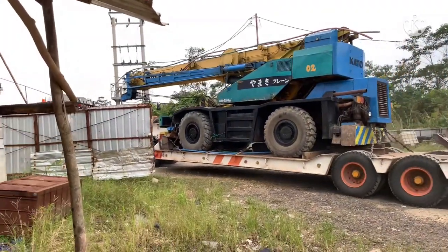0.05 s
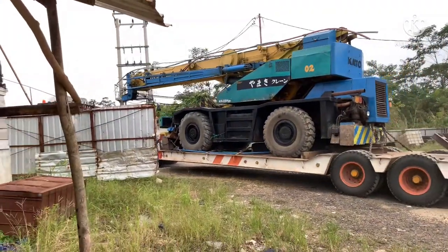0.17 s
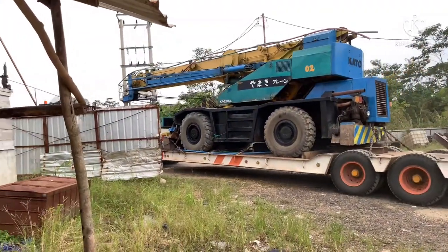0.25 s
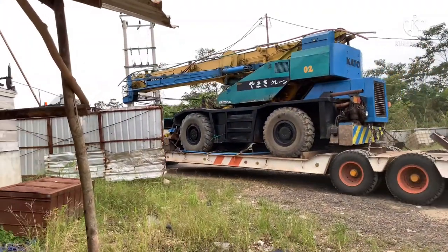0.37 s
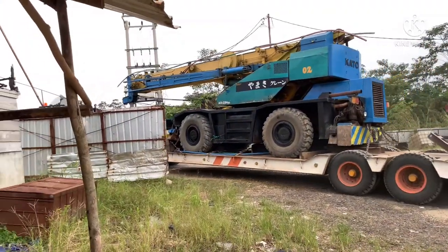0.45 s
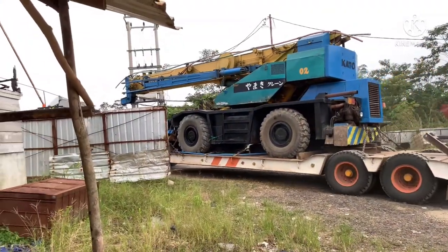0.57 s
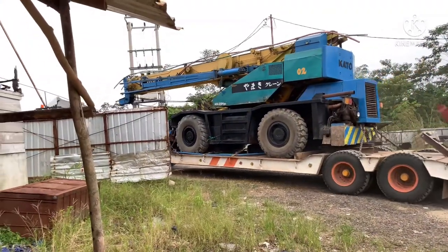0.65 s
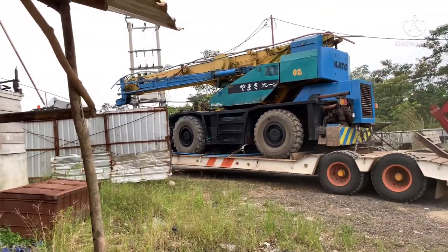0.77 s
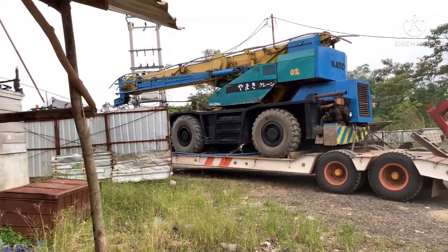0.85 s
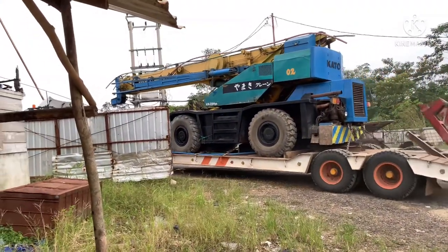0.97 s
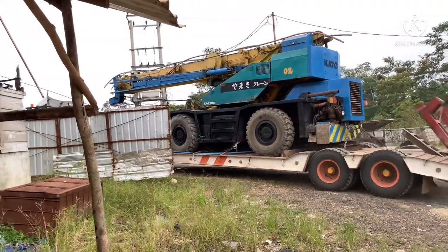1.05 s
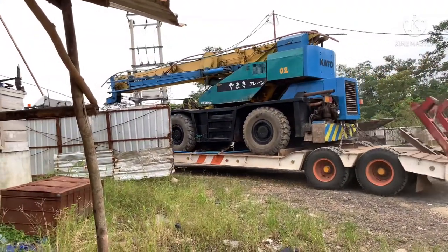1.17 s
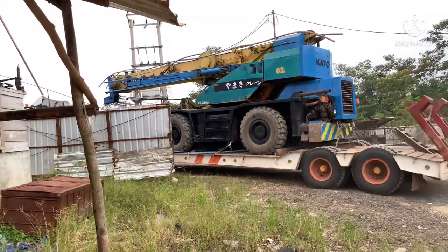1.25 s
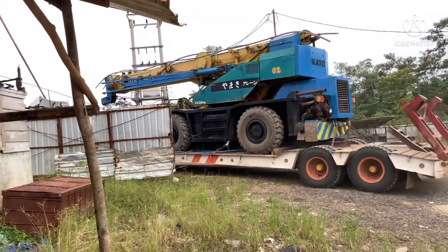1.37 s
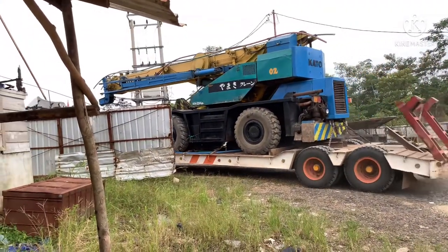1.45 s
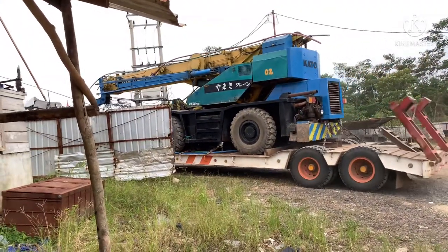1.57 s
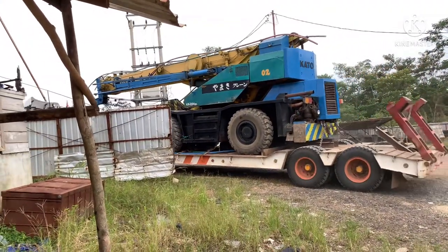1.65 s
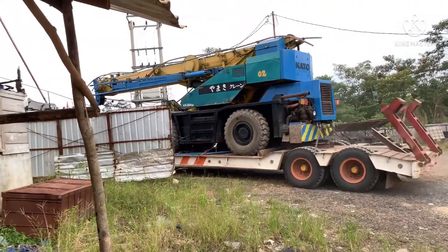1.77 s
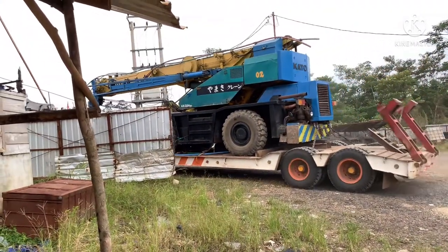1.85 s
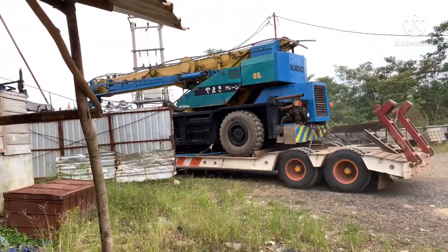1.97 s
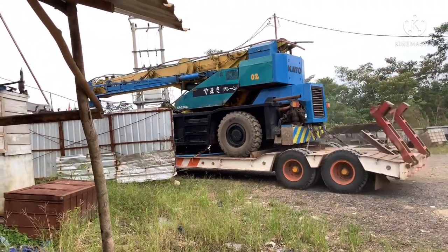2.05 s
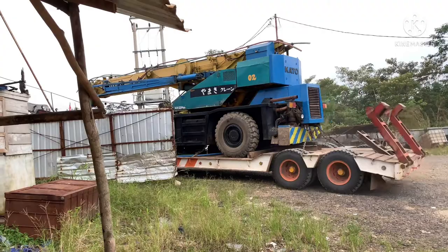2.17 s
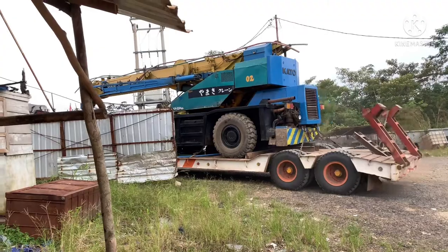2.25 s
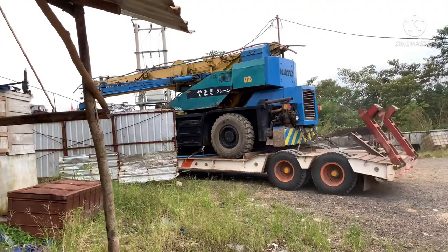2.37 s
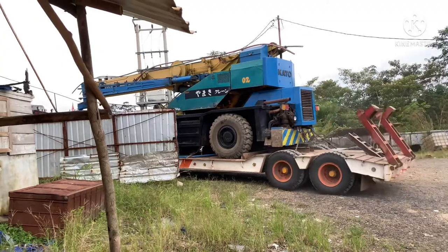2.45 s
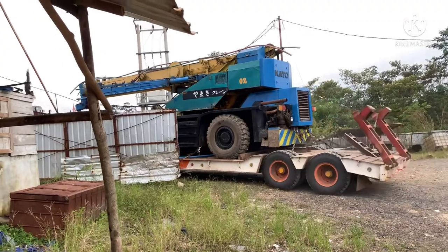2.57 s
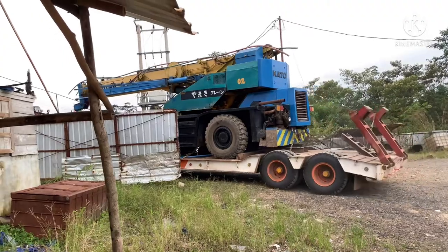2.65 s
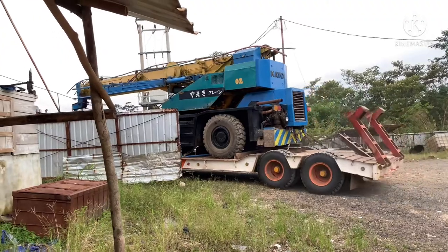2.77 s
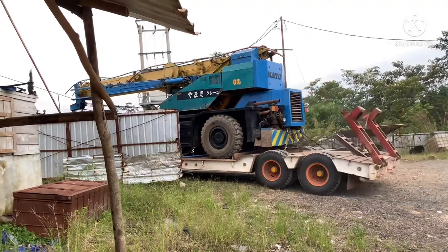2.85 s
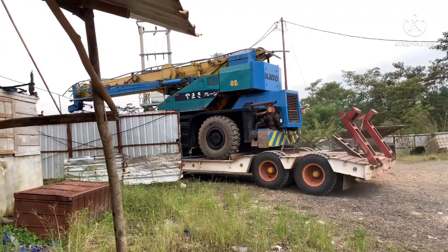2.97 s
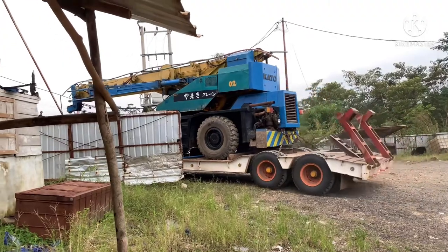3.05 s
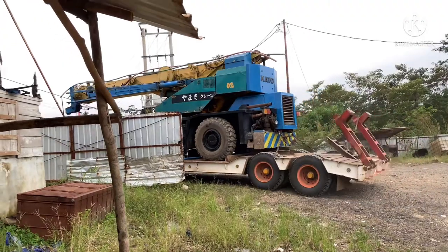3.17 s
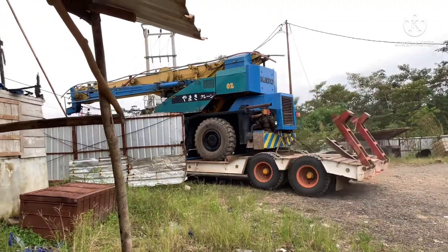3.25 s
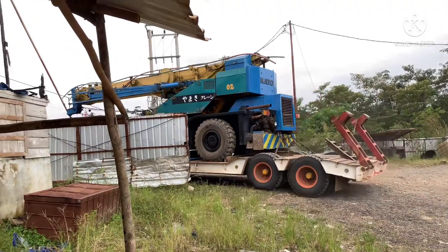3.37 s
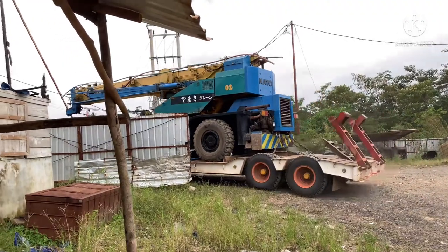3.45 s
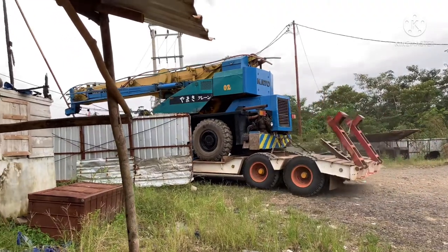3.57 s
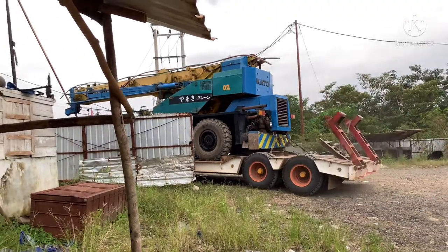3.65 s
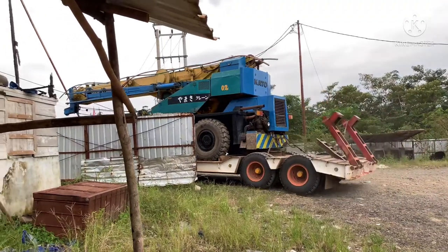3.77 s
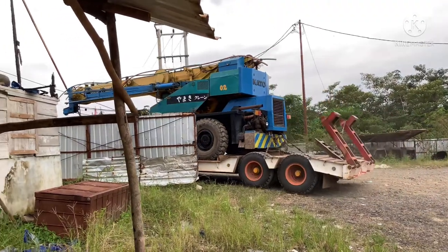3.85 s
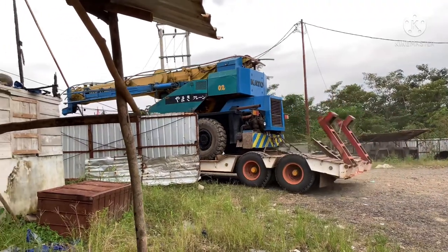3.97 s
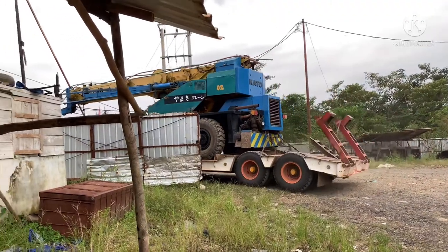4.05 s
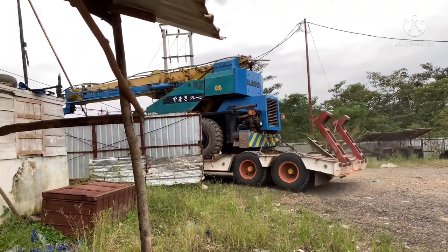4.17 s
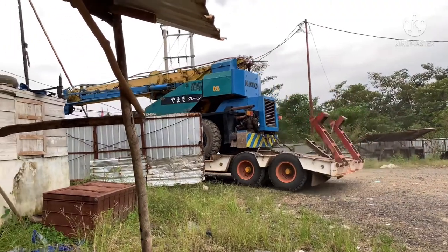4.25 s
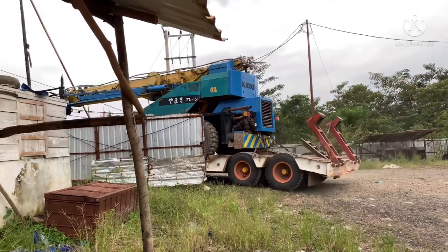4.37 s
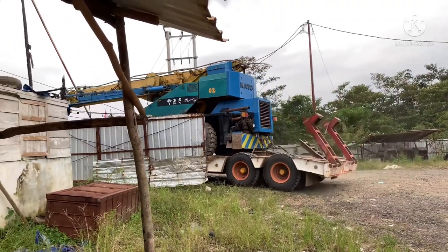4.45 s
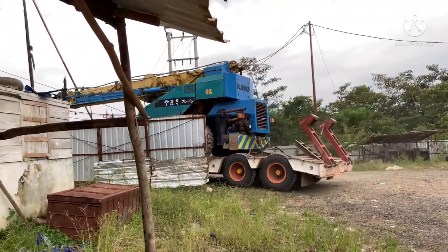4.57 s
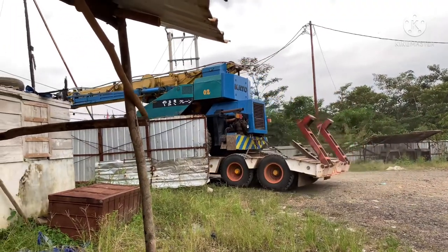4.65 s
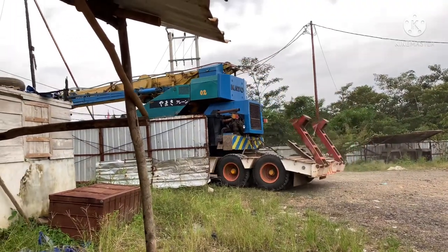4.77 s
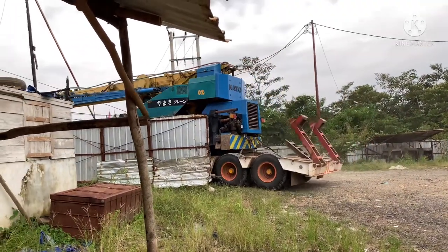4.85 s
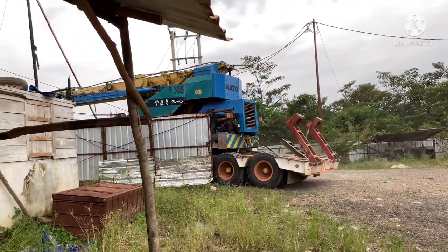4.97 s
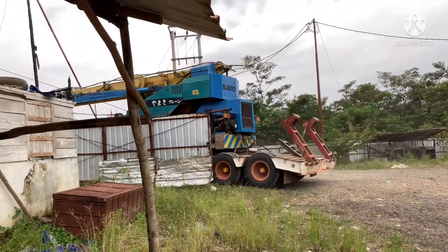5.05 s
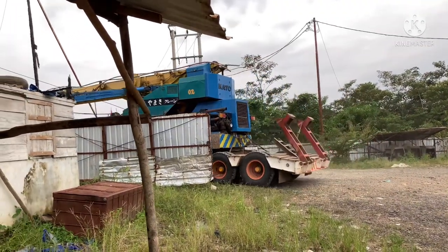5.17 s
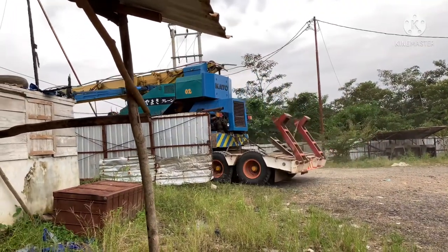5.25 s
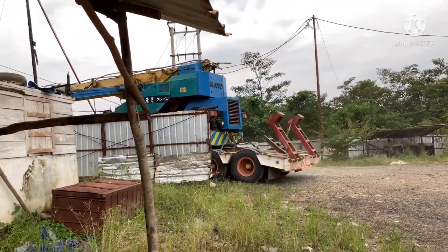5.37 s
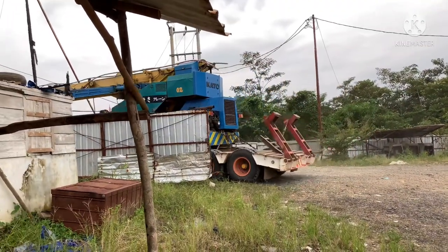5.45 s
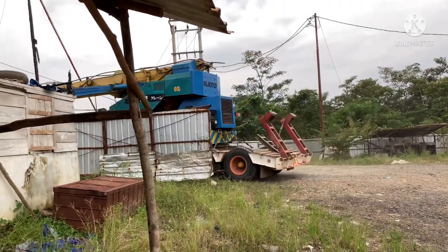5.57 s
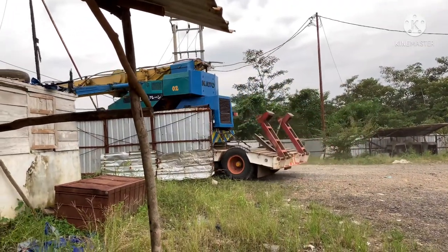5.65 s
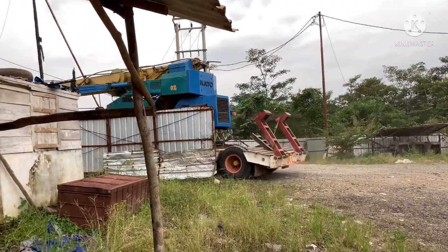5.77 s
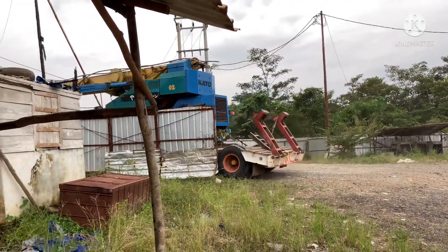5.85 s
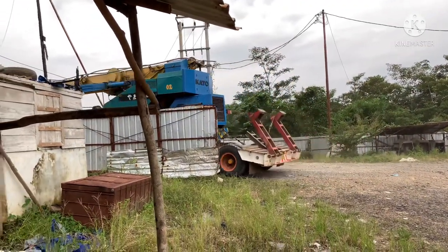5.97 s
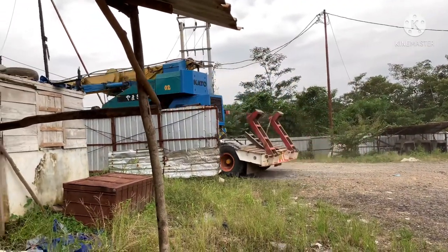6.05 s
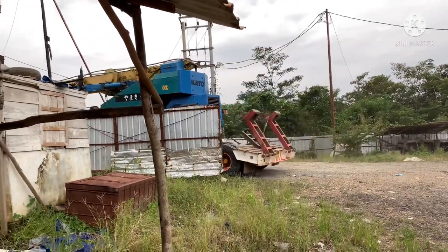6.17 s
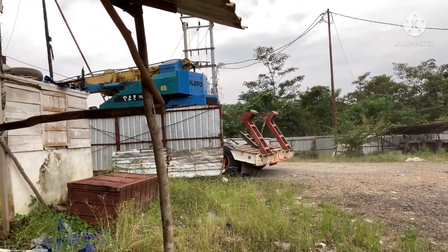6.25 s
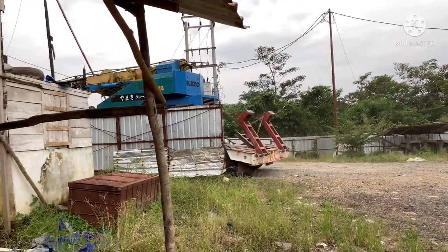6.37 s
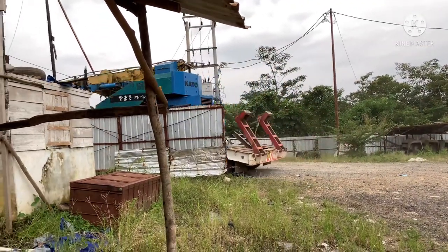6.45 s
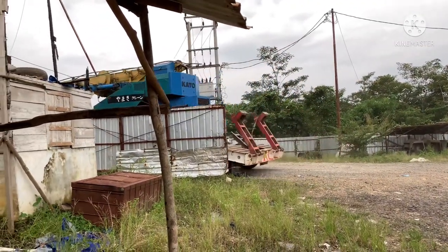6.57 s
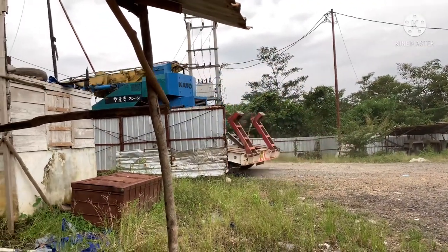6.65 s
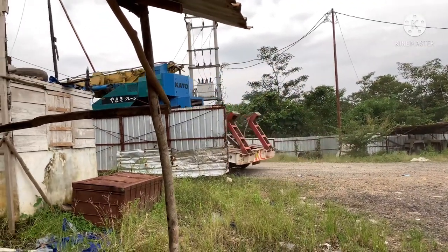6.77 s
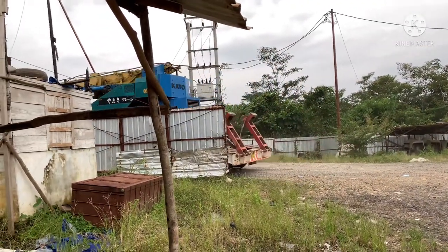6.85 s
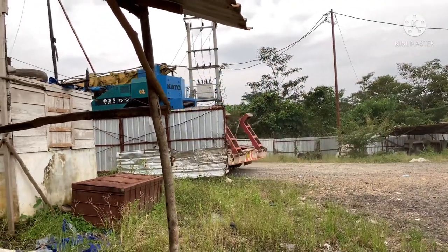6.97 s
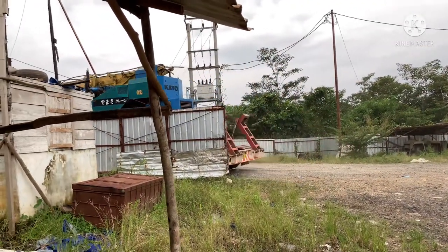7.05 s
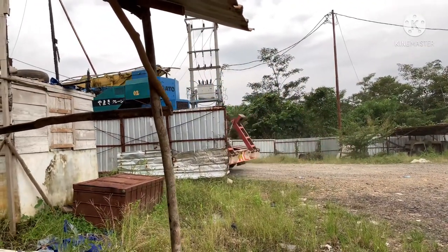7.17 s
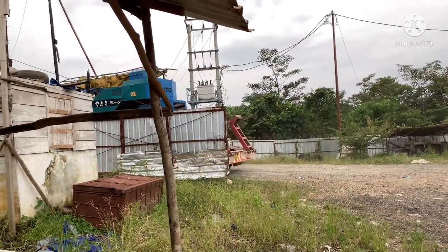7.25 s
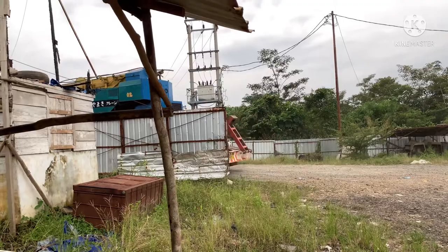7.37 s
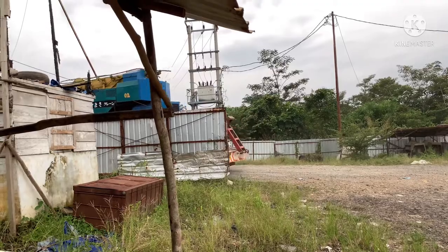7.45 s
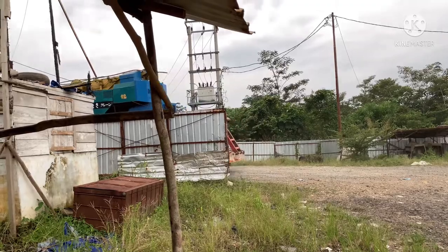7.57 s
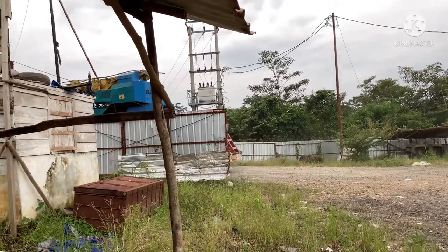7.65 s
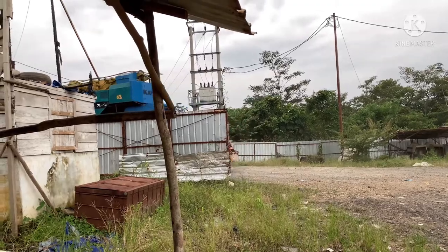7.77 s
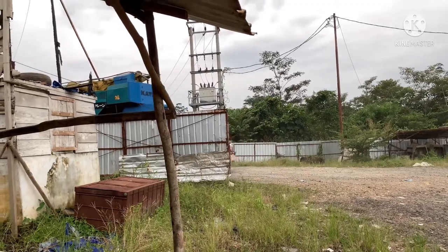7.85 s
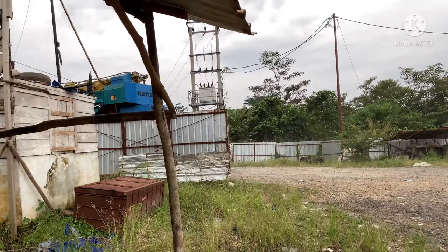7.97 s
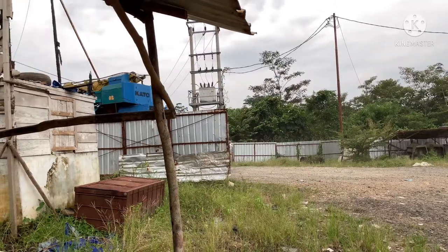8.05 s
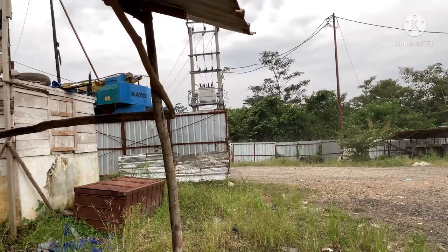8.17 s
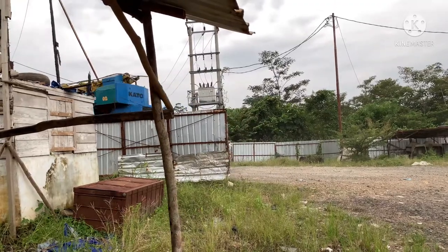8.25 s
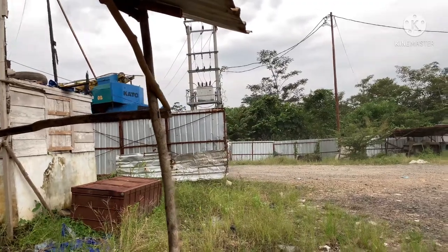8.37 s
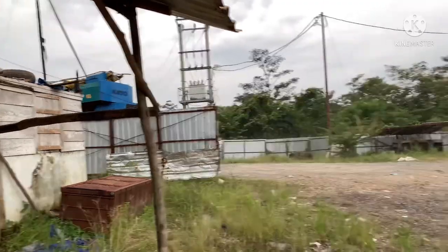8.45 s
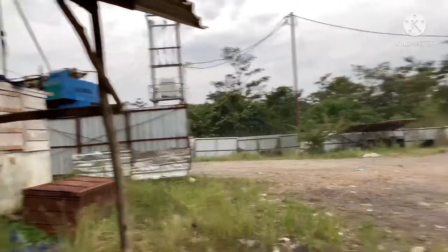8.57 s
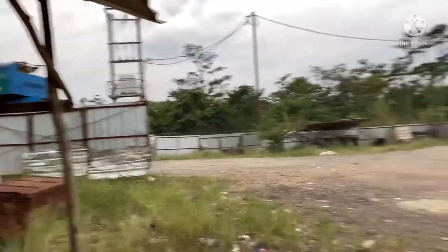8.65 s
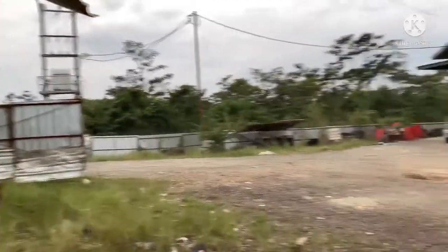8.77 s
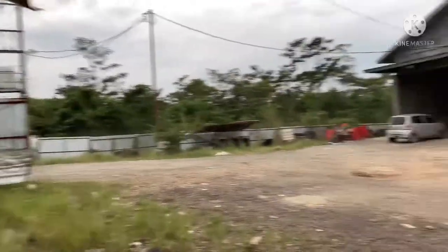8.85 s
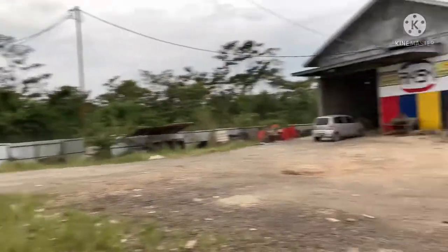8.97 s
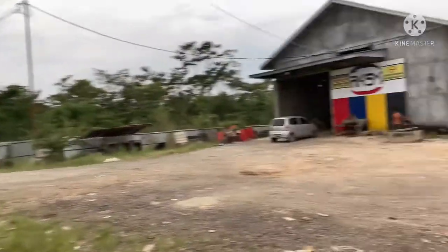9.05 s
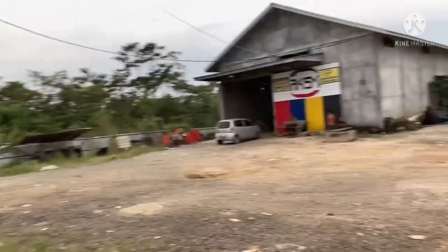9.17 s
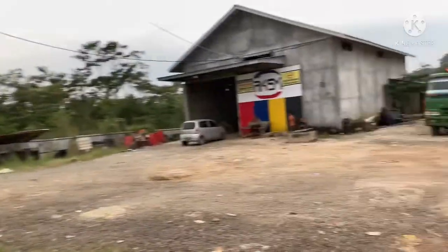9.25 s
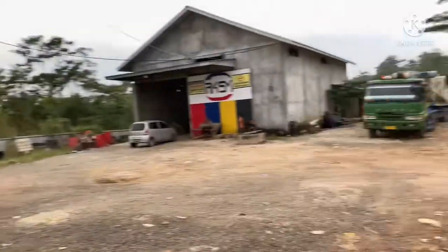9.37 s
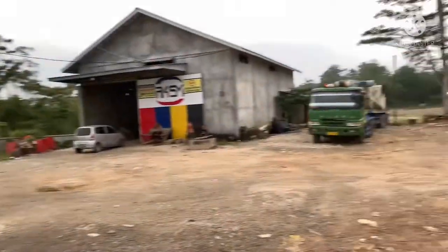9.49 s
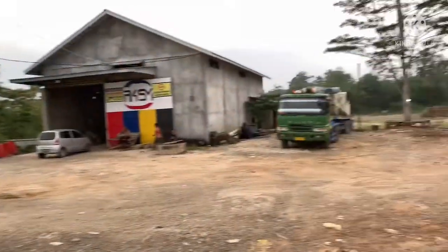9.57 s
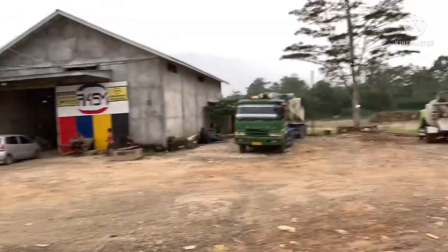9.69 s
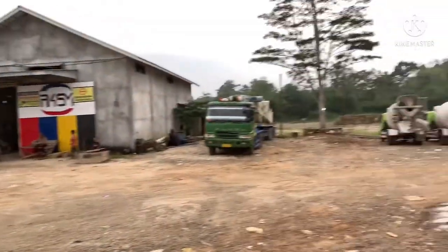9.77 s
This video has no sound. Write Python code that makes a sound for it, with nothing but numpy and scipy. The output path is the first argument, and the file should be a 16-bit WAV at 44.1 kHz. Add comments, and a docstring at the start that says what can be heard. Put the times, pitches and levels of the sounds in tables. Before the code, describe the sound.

Open dirt yard, stereo microphone roughly ten metres from a slow heavy diesel truck hauling a crane on a low trailer. From 0 s the engine drones low with a clattering top and thin whine, over drumming deck, loose steel rattle and dense grit crackle. A chain clinks at 0.2, steel clanks at 0.5, a jolt thuds at 1.3, and the hardest double bang lands at 1.9-2.0. The engine sags to its lowest near 2.4, stones crunch, then from 2.8 it pulls and climbs, easing off around 4.7 at a higher pitch. Sharp ticks snap at 2.8, 3.4 and 5.4; plates slap between 3.7 and 7, with a clattering burst near 6. Everything gradually dulls behind a fence. At 7.3 dragged steel raps and groans, followed by a brief squeak. From 8.3 the microphone swings away; the truck fades, small squeaks sound, and distant trucks whirr and whine until 9.8.

```python
"""A six-cylinder diesel tractor hauls a low trailer with a crane slowly past a dirt yard and behind a fence.
The engine lugs, picks up and recedes; the deck rumbles and rattles, tyres crunch grit, the load knocks
and groans, and at the end the microphone turns toward other trucks across the yard.
Engine tones, a thin whine and squeaks are wavering sines, with filtered pulses for the exhaust puffs; blows
are decaying modes; rumble, clatter, grit and the yard are coloured noise, often broken into random grains."""
import sys
import numpy as np
from scipy import signal
from scipy.fft import rfft, irfft, next_fast_len
from scipy.io import wavfile
from scipy.ndimage import uniform_filter1d, map_coordinates

SR = 44100
rng = np.random.default_rng(int(sys.argv[2]) if len(sys.argv) > 2 else 0)


def output_pcm(signal):
    """Save a mono or channel-first signal as 16-bit PCM at the path in sys.argv[1].

    Samples are clipped to [-1, 1] before scaling.
    """
    pcm = np.clip(np.atleast_2d(signal).T, -1, 1) * 32767
    wavfile.write(sys.argv[1], SR, np.round(pcm).astype(np.int16))


N = 433062


def amp(db):
    """Decibels: a level becomes an amplitude ratio."""
    return 10 ** (np.asarray(db) / 20)


def unit(x):
    """Normalisation: the signal is scaled to rms 1."""
    return x / np.sqrt(np.mean(x ** 2) + 1e-20)


def seconds():
    """Sampling: the time of each sample."""
    return np.arange(N) / SR


def along(points, hz):
    """Logarithmic frequency: (Hz, value) points are joined on a log axis."""
    point_hz, values = np.transpose(points)
    return np.interp(np.log(hz + 1), np.log(point_hz + 1), values)


def curves(rows):
    """Slow modulation: one value per sample for each column after the time."""
    times, *columns = np.transpose(rows)
    return [np.interp(seconds(), times, column) for column in columns]


def swells(rows):
    """Gaussian modulation: a level in dB made of smooth humps and hollows."""
    return sum(db * np.exp(-((seconds() - s) / width) ** 2) for s, db, width in rows)


def wobble(rate):
    """Random modulation: a smooth curve through normal draws, rate knots a second."""
    positions = np.arange(0, N + 32, 32) * rate / SR
    knots = map_coordinates(rng.standard_normal(4000), [positions], mode="wrap")
    # straight lines between points 32 samples apart
    return (knots[:-1, None] + np.diff(knots)[:, None] * np.arange(32) / 32).ravel()[:N]


def filtered(x, response):
    """Linear filtering: the spectrum is multiplied by a response of frequency."""
    m = next_fast_len(N + SR // 4, True)
    return irfft(rfft(x, m) * response(np.fft.rfftfreq(m, 1 / SR)), m)[..., :N]


def colour(points):
    """Spectral shaping: the response that follows (Hz, dB) points."""
    return lambda hz: amp(along(points, hz))


def ringing(modes):
    """Modal resonance: the summed response of damped resonators (Hz, width Hz, dB)."""
    return lambda f: sum(amp(db) * 1j * f * w / (c * c - f * f + 1j * f * w) for c, w, db in modes)


# Likeness of left and right before the treble lead. Each row: frequency in Hz, correlation from -1 to 1.
PORT_CORRELATION = [(60, .99), (130, .96), (290, .97), (600, .72), (880, .68), (1300, .22), (2300, .75),
                    (3100, .35), (4600, .3), (6500, .6), (9000, .5), (15000, .5)]
LEAD_S, LEAD_ABOVE_HZ = .000453, 1050


def rush(response, drive=1):
    """Partial coherence: driven noise at two ports, mid rms 1; in the treble the left port leads."""
    m = next_fast_len(N + SR // 20, True)
    hz = np.fft.rfftfreq(m, 1 / SR)
    noise = (rng.standard_normal((2, N), np.float32) * drive).astype(np.float32)
    common, opposed = rfft(noise, m) * response(hz)
    alike = np.clip(along(PORT_CORRELATION, hz), -1, 1)
    common, opposed = common * np.sqrt(1 + alike), opposed * np.sqrt(1 - alike)
    lead = np.where(hz > LEAD_ABOVE_HZ, np.exp(2j * np.pi * hz * LEAD_S), 1)
    pair = irfft(np.array([(common + opposed) * lead, common - opposed], np.complex64), m)[:, :N]
    return pair / np.sqrt(np.mean(pair.mean(0) ** 2))


RISE_SHARE = 0.1  # a burst's rise time over its t60


def bursts(rows):
    """Exponential decay: events swell to a peak and die away; long ones swell more slowly."""
    t, power = seconds(), np.zeros(N)
    for s, db, t60 in rows:
        near = slice(max(0, int((s - .2) * SR)), int((s + .5) * SR))
        u = t[near] - s
        fall = amp(db - 60 * np.maximum(u, 0) / t60) ** 2
        power[near] += fall * np.exp(2 * np.minimum(u, 0) / (RISE_SHARE * t60))
    return np.sqrt(power)


def grains(rate, spread_db, life):
    """Random impacts: an envelope, rms 1, of brief contacts of random strength; life in seconds."""
    at = np.flatnonzero(rng.random(N) < rate / SR)
    hits = np.zeros(N)
    hits[at] = amp(spread_db * np.minimum(rng.exponential(size=N)[at], 4)) ** 2
    power = signal.lfilter([1], [1, -np.exp(-2 / (life * SR))], hits)
    return unit(np.sqrt(np.abs(power)))


def strikes(rows, modes):
    """Impulsive excitation: sharp blows set a body ringing at its modes, each blow scattering their levels."""
    out, t = np.zeros(N), np.arange(SR // 3) / SR
    for s, db in rows:
        ring = 0
        for hz, mode_db, t60 in modes:
            fading = amp(mode_db + rng.normal(0, 1) - 60 * t / t60)
            ring = ring + fading * np.sin(2 * np.pi * hz * t)
        out[round(s * SR):][:len(t)] += amp(db) * ring
    return out


def patchy(x, depth_db):
    """Time-frequency modulation: narrow streaks of the roar swell and fade at random."""
    z = signal.stft(x, nperseg=2048)[2]
    field = uniform_filter1d(rng.standard_normal(z.shape[1:]), size=3, axis=0)
    field = uniform_filter1d(field, size=7, axis=1)
    mean_gain = np.sqrt(np.mean(amp(depth_db * field / field.std()) ** 2))
    return signal.istft(z * amp(depth_db * unit(field)) / mean_gain, nperseg=2048)[1][:, :N]


SPEED_M_PER_S, DISTANCE_M = 1.668, 10.37  # speed and nearest distance
ENGINE_AHEAD_M = 2.65  # the engine is ahead of the trailer's wheels
FENCE_M, FENCE_LENGTH_M = 6.77, 8.26  # along the road: start of the fence's shadow, way to full shadow
TURN_S, TURN_LENGTH_S = 8.29, 1  # the microphone swings away toward the yard


def hidden(ahead_m=0):
    """Barrier shadow: how deep a part of the truck is behind the fence, 0-1."""
    return np.clip((SPEED_M_PER_S * seconds() + ahead_m - FENCE_M) / FENCE_LENGTH_M, 0, 1)


def turned():
    """Microphone directivity: how far it has swung toward the yard, 0-1."""
    return np.clip((seconds() - TURN_S) / TURN_LENGTH_S, 0, 1)


def passing(shade_db, turn_db=0, ahead_m=0):
    """Spherical spreading: the level change in dB from distance, fence and turn of the microphone."""
    distance = np.hypot(DISTANCE_M, SPEED_M_PER_S * seconds() + ahead_m)
    return 20 * np.log10(DISTANCE_M / distance) - shade_db * hidden(ahead_m) - turn_db * turned()


# Spectrum of the distant trucks. Each row: frequency in Hz, relative level in dB per Hz.
YARD_SPECTRUM = [(60, -1), (100, 21.5), (150, 8.5), (200, 4), (300, 0.5), (430, 5), (560, 2), (900, -3.5),
                 (1250, 2.5), (1600, -7.5), (2050, -10), (2400, -17), (3100, -9.5), (4300, -25),
                 (7000, -46), (11000, -26.5), (14000, -65)]


def yard():
    """Diffuse broadband noise: the whirr of other trucks comes in as the microphone turns to them."""
    return amp(-38.5 + 1.4 * wobble(7.7)) * np.sqrt(turned()) * rush(colour(YARD_SPECTRUM))


# Tones of a truck across the yard. Each row: frequency in Hz, relative level in dB.
FAR_WHINE_TONES = [(1190, -5), (1315, -0.5), (1390, -3)]
# Their common level before the turn. Each row: time in seconds, level in dB.
FAR_WHINE_COURSE = [(8.9, -66), (9.2, -48), (9.58, -50.5), (9.72, -47), (9.82, -43)]


def far_whine(waver_hz=18, flutter_db=2.5):
    """Frequency modulation: a truck across the yard whines in a cluster of wavering tones that firms up."""
    level_db, = curves(FAR_WHINE_COURSE)

    def tone(hz):
        cycles = np.cumsum(hz + waver_hz * wobble(60)) / SR + rng.random()
        return np.sin(2 * np.pi * cycles)

    def cluster():
        return sum(amp(level_db + db + flutter_db * wobble(23)) * tone(hz) for hz, db in FAR_WHINE_TONES)

    return turned() * np.array([cluster() for port in range(2)])


# Squeaks of dry joints. Each row: centre in seconds, mean pitch in Hz, level in dB, half width in seconds.
JOINT_SQUEAKS = [(7.51, 1730, -52, 0.036), (8.68, 2740, -47, 0.013), (8.77, 2670, -51, .02),
                 (8.9, 2450, -48, .06), (9.37, 1580, -46.5, 0.032)]
SQUEAK_WAVER_HZ, SQUEAK_WAVERS_PER_S = 85, 260


def squeaks():
    """Friction-driven vibration: dry steel joints on the trailer give brief squeaks of rough pitch."""
    t, shake = seconds(), SQUEAK_WAVER_HZ * wobble(SQUEAK_WAVERS_PER_S)
    out = np.zeros(N)
    for s, hz, db, width in JOINT_SQUEAKS:
        hump = np.exp(-((t - s) / width) ** 2)
        out += amp(db) * hump * np.sin(2 * np.pi * np.cumsum(hz + shake) / SR)
    return out


# Spectrum of crackling grit. Each row: frequency in Hz, relative level in dB per Hz.
GRIT_SPECTRUM = [(2000, -25), (5000, -7), (7500, -5), (9500, 1), (12000, 1), (13200, -10), (15500, -10)]
# Base level of grit and sand. Each row: time in seconds, level in dB.
GRIT_COURSE = [(0, -48.5), (.6, -52), (2.6, -53), (4, -55.5), (6.2, -60.5), (7.2, -67), (7.8, -70),
               (9.82, -81)]
# Grit spurts from under a tyre. Each row: centre in seconds, extra level in dB, half width in seconds.
GRIT_SPURTS = [(5.89, 6, 0.051), (7.35, 12.5, 0.07)]
# Spectrum of sand and ticks. Each row: frequency in Hz, relative level in dB per Hz.
TICK_SPECTRUM = [(2000, -13), (7000, -28), (10000, 2), (14000, 4), (16000, 8)]
# Spectrum of crushed stones. Each row: frequency in Hz, relative level in dB per Hz.
STONE_SPECTRUM = [(300, -30), (1200, 6), (2400, 14), (3800, 12), (5500, 4.5), (11000, 1.5), (16000, -43)]
# Stones crushed under a tyre. Each row: peak in seconds, level in dB, t60 in seconds.
STONE_CRUNCHES = [(.03, -40, 1.2), (.179, -36, 0.055), (1.025, -40, 0.063), (2.346, -40, 0.053),
                  (2.488, -41.5, 0.057), (2.587, -37.5, 0.18), (3.16, -44, 0.15), (3.938, -50, 0.12)]
# Sharp little ticks. Each row: peak in seconds, level in dB.
SHARP_TICKS = [(.095, -35), (.331, -35), (2.8145, -24.5), (3.4414, -32), (5.3715, -30), (5.866, -37),
               (5.901, -35), (5.929, -45), (6.79, -46)]
# A stone hits a wheel rim. Each row: start in seconds, level in dB.
RIM_PINGS = [(5.37, -35)]
# Modes of the rim. Each row: frequency in Hz, mean level relative to the blow in dB, t60 in seconds.
RIM_MODES = [(2310, -6, .02), (4110, -1.5, 0.028), (6830, -8, .015)]
TICK_T60_S = 0.0054


def tyres(sand_db=-7):
    """Granular contact: grit and sand crackle under the wheels; stones are crushed, snap or hit a rim."""
    grit_db, = curves(GRIT_COURSE)
    grit_noise = rush(colour(GRIT_SPECTRUM), grains(rate=3600, spread_db=2.5, life=0.003))
    grit = amp(grit_db + swells(GRIT_SPURTS) + 0.78 * wobble(9)) * grit_noise
    sand_noise = rush(colour(TICK_SPECTRUM), grains(rate=830, spread_db=2.0, life=.0015))
    sand = amp(grit_db + sand_db - 16 * hidden() + 1.8 * wobble(11)) * sand_noise
    stone_noise = rush(colour(STONE_SPECTRUM), grains(rate=1100, spread_db=4.5, life=.001))
    stones = bursts(STONE_CRUNCHES) * stone_noise
    snaps = bursts([(s, db, TICK_T60_S) for s, db in SHARP_TICKS]) * rush(colour(TICK_SPECTRUM))
    return grit + sand + stones + snaps + strikes(RIM_PINGS, RIM_MODES)


# The crane bounces hard on the deck beams. Each row: start in seconds, level in dB.
CRANE_BOUNCES = [(1.946, -13.5), (1.9695, -12.5), (2.0, -20), (2.022, -15)]
# Modes of the beams. Each row: frequency in Hz, mean level relative to the blow in dB, t60 in seconds.
BEAM_MODES = [(129.4, -5, 0.14), (159, -7, 0.12), (235, -10, 0.09), (464, -12.5, 0.1)]
# The load drops on the deck. Each row: peak in seconds, level in dB, t60 in seconds.
LOAD_DROPS = [(.49, -37, 0.3), (1.11, -36, .25), (1.305, -29.5, 0.22), (1.946, -22, 0.19),
              (1.973, -24.5, 0.19), (2.3, -34.5, .3), (8.57, -38, 0.16)]
# Spectrum of the drops. Each row: frequency in Hz, relative level in dB per Hz.
THUD_SPECTRUM = [(40, -30), (90, -17), (130, 21), (200, 0), (350, 6), (700, -9), (1500, -13), (2200, -6.5),
                 (3000, -16.5), (4600, -17), (8000, -29), (16000, -58)]


def knocks():
    """Impact: beam modes ring under the crane's bounces, and grainy noise bursts thud."""
    thud = rush(colour(THUD_SPECTRUM), grains(rate=660, spread_db=1.5, life=0.013))
    return strikes(CRANE_BOUNCES, BEAM_MODES) + bursts(LOAD_DROPS) * thud


# A lashing chain clinks. Each row: peak in seconds, level in dB, t60 in seconds.
CHAIN_CLINKS = [(.02, -46.5, 4), (.192, -23.5, 0.017), (6.0, -54, 0.6)]
# Resonances of the chain. Each row: frequency in Hz, width in Hz, relative level in dB.
CHAIN_MODES = [(2340, 90, -9), (2640, 80, -2), (3630, 88, -5.5)]


def chain():
    """Resonant filtering: grainy contacts of the links excite the chain's resonances."""
    return bursts(CHAIN_CLINKS) * rush(ringing(CHAIN_MODES), grains(rate=1000, spread_db=2.5, life=0.0018))


# A shackle raps on the frame. Each row: start in seconds, level in dB.
SHACKLE_RAPS = [(1.908, -19), (4.667, -23.5), (7.287, -25.5)]
# Modes of the frame. Each row: frequency in Hz, mean level relative to the blow in dB, t60 in seconds.
FRAME_MODES = [(640, -7, .035), (815, -5, .03), (1240, -11, 0.018), (1930, -18, .015)]


def raps():
    """Modal response: each rap of the shackle rings the frame."""
    return strikes(SHACKLE_RAPS, FRAME_MODES)


# Loose deck plates slap down. Each row: start in seconds, level in dB before the trim, note in Hz.
PLATE_SLAPS = [(0.484, -14, 466), (0.569, -22, 258), (1.264, -19, 240), (1.297, -11, 293),
               (1.775, -15, 320), (1.907, -18, 250), (3.669, -17, 315), (4.629, -20, 315),
               (4.667, -24, 374), (5.174, -17.5, 366), (5.225, -17, 357), (5.946, -26, 256),
               (6.042, -18.5, 252.4), (6.409, -23, 331), (6.638, -20, 323), (7.005, -23, 272)]
SLAP_TRIM_DB, SLAP_T60_S = -4.5, 0.064
SLAP_OVERTONE, SLAP_OVERTONE_DB = 1.7, -8.5  # multiple of the note, mean level against it


def slaps():
    """Inharmonic modes: each loose plate rings briefly at its note and one inharmonic overtone."""
    out = np.zeros(N)
    for s, db, hz in PLATE_SLAPS:
        note = (hz, 0, SLAP_T60_S)
        overtone = (SLAP_OVERTONE * hz, SLAP_OVERTONE_DB, SLAP_T60_S / 2)
        out += strikes([(s, db + SLAP_TRIM_DB)], [note, overtone])
    return out


# The crane slips on the bed. Each row: start in seconds, length in seconds, level in dB before trims.
CRANE_SLIPS = [(7.284, 0.108, -27), (7.516, 0.02, -32)]
SLIP_T60_S = 0.22


def slipping(rise_s):
    """Exponential relaxation: the envelope of the slips, with attack, hold and release."""
    t, force = seconds(), np.zeros(N)
    for s, length, db in CRANE_SLIPS:
        release = amp(db - 60 * np.maximum(t - s - length, 0) / SLIP_T60_S)
        force += release * -np.expm1(-np.maximum(t - s, 0) / rise_s)
    return force


# Spectrum of steel dragged over the bed. Each row: frequency in Hz, relative level in dB per Hz.
SCRAPE_SPECTRUM = [(150, -22), (260, 14.5), (480, -6), (650, 4.5), (870, -2.5), (1050, -6), (1550, -22),
                   (1900, -21), (4000, -24), (8000, -54), (14000, -50)]
# Loose ramps and chocks clatter on the bed. Each row: peak in seconds, level in dB, t60 in seconds.
RAMP_CLANKS = [(.49, -25.5, 0.17), (5.98, -28.5, 0.22), (6.2, -32.5, 0.89), (8.6, -36.5, 0.67)]
SCRAPE_TRIM_DB, SCRAPE_RISE_S = -1, 0.0023


def scrape():
    """Rough contact: dense grains of noise follow the slips and the clatter of loose steel."""
    envelope = amp(SCRAPE_TRIM_DB) * slipping(SCRAPE_RISE_S) + bursts(RAMP_CLANKS)
    return envelope * rush(colour(SCRAPE_SPECTRUM), grains(rate=2800, spread_db=0.5, life=0.0019))


# Modes of the bed. Each row: frequency at full force in Hz, random pitch waver in Hz, relative level in dB.
BED_MODES = [(232, 14, -5), (355, 16.5, -6), (667, 27, 1.5), (727, 10, 3.5), (865, 27.4, -4),
             (1040, 50, -13), (1170, 30, -14), (1354, 20, -12), (1450, 16, -9), (1546, 50, -14)]
RING_RISE_S = 0.034
SLIP_BEND = .015  # the groan's pitch rises by this share as the slip gathers force


def groan(ring_db=-1, judder_hz=118, judder=0.34):
    """Stick-slip friction: dragged steel sings at the bed's modes, bends with the force and judders."""
    force = slipping(RING_RISE_S)
    bend = 1 + SLIP_BEND * (force / force.max() - 1)
    ring = np.zeros(N)
    for hz, width, db in BED_MODES:
        cycles = np.cumsum(bend * hz + width * wobble(110)) / SR
        ring += amp(db + 2.4 * wobble(65)) * np.sin(2 * np.pi * cycles)
    slips = 1 + judder * np.cos(2 * np.pi * np.cumsum(judder_hz * (1 + .12 * wobble(50))) / SR)
    return amp(ring_db) * force * unit(ring * slips)


def load():
    """Superposition: the crane knocks, tugs a chain and slips with a groan; loose steel clatters."""
    return knocks() + chain() + scrape() + raps() + slaps() + groan()


# Spectrum of the drumming deck. Each row: frequency in Hz, relative level in dB per Hz.
DECK_SPECTRUM = [(20, -34), (38, -27), (55, 4.5), (85, 0), (125, 5.5), (170, 4), (240, 2.5), (300, 0),
                 (390, -2.5), (460, -10), (600, -36), (1000, -49), (2000, -80)]
# Spectrum of loose steel. Each row: frequency in Hz, relative level in dB per Hz.
RATTLE_SPECTRUM = [(250, -43), (450, -4.5), (560, -6.5), (660, -2), (850, -2.5), (1020, -6.5), (1220, -6),
                   (1450, -10.5), (1750, -13.5), (2200, -46), (4000, -61)]
# Rough ground under the trailer. Each row: centre in seconds, extra level in dB, half width in seconds.
GROUND_RUTS = [(.13, 2, 0.11), (.48, 2.5, 0.061), (.68, -1, 0.12), (1.24, 5, 0.18), (1.6, -3.5, 0.5),
               (3.12, 1.5, 0.068), (6.08, 4.5, 0.17)]


def trailer():
    """Forced vibration: rough ground makes the deck drum low and, half as strongly in dB, rattles loose steel."""
    ground_db = swells(GROUND_RUTS)
    rumble_db = -26.5 + ground_db + passing(shade_db=4.0, turn_db=5.0, ahead_m=1)
    rattle_db = -33.5 + .5 * ground_db + passing(shade_db=9, turn_db=4.0)
    rumble = amp(rumble_db + 0.56 * wobble(16)) * rush(colour(DECK_SPECTRUM))
    contacts = grains(rate=1800, spread_db=1.5, life=.003)
    rattle = amp(rattle_db + 0.22 * wobble(14)) * rush(colour(RATTLE_SPECTRUM), contacts)
    return rumble + rattle


def whine(firings, pitch_hz, level_db):
    """Phase modulation: a thin, unsteady whine of steady mean pitch, with sidebands at the firing rate."""
    pitch_phase = 2 * np.pi * np.cumsum(pitch_hz + 18 * wobble(40)) / SR
    phase = pitch_phase + 1.1 * np.sin(2 * np.pi * firings)

    def port_tone():
        return amp(level_db + 3.3 * wobble(25)) * np.sin(phase + 1.1 * wobble(170))

    return np.array([port_tone() for port in range(2)])


# Spectrum of the engine's clatter. Each row: frequency in Hz, relative level in dB per Hz.
CLATTER_SPECTRUM = [(1000, -12.5), (1900, -2.5), (2350, 2), (2700, -3.5), (3150, -6), (3700, -7),
                    (4700, -7.5), (5400, -8), (6400, -10.5), (7500, -7.5), (8600, -35), (14000, -52)]


def clatter(firings):
    """Amplitude modulation: combustion knock and injectors are noise that swells slightly at every firing."""
    beat = 1 + 0.024 * np.cos(2 * np.pi * firings)
    level_db = -42 + passing(shade_db=4.5, turn_db=-1.3, ahead_m=ENGINE_AHEAD_M)
    noise = rush(colour(CLATTER_SPECTRUM), beat * amp(0.95 * wobble(160)))
    return amp(level_db + 0.45 * wobble(8.6)) * noise


def engine_tone(firings, multiple, waver):
    """Harmonic order: a sine, rms 1, at a multiple of the firing rate; its phase wavers, in radians."""
    phase = 2 * np.pi * (multiple * firings + rng.random())
    return np.sqrt(2) * np.sin(phase + waver * wobble(15))


# Level of the firing tone before its dips. Each row: time in seconds, level in dB.
BOOM_COURSE = [(0, -29), (.7, -27.5), (1.6, -27.5), (2.75, -22), (3.35, -25), (3.85, -29.5), (5.05, -25.5),
               (5.9, -26), (7.85, -27.5), (8.7, -32.5), (9.1, -34.5), (9.45, -28.5), (9.82, -34)]
# The firing tone dips briefly. Each row: centre in seconds, change in dB, half width in seconds.
BOOM_DIPS = [(4.76, -9, 0.083), (5.23, -10, 0.097), (5.47, -15, 0.086), (8.5, -10, 0.17)]


def boom(firings):
    """Periodic excitation: the strong firing tone, with weak tones at 1/2 and 5/6 of its rate."""
    boom_db = curves(BOOM_COURSE)[0] + swells(BOOM_DIPS)
    tones = engine_tone(firings, 1, 0.18)
    tones += amp(-24.5) * engine_tone(firings, 1 / 2, .2)
    tones += amp(-18.0) * engine_tone(firings, 5 / 6, 0.3)
    return amp(boom_db + 0.61 * wobble(9.2)) * tones


# Weaker engine tones, the one at 2.65 from the cooling fan. Each row: multiple of the firing rate,
# then levels in dB before the pipe's boost and the drive past: lugging, pulling, eased off;
# last, phase waver in radians.
ENGINE_OVERTONES = [(1.5, -37, -33, -34.5, .45), (2, -38.5, -43, -31, .1), (2.65, -43, -46, -46, 0.33),
                    (3, -39, -45, -55, 0.25), (4.5, -44.5, -45, -41.5, 0.7), (5, -46.5, -38, -39.5, 0.84)]
PULL_S, PULL_LENGTH_S = 2.792, 1  # the engine starts to pick up
EASE_S, EASE_LENGTH_S = 4.69, 0.25  # the driver eases off the throttle
PIPE_HZ, PIPE_WIDTH_HZ, PIPE_BOOST_DB = 163, 9.1, 9.5


def overtones(firings, rate_hz, away_db):
    """Resonance: weaker engine tones follow the load and swell as they cross the pipe's resonance."""
    times = [PULL_S, PULL_S + PULL_LENGTH_S, EASE_S, EASE_S + EASE_LENGTH_S]
    out = np.zeros(N)
    for multiple, lugging_db, pulling_db, eased_db, waver in ENGINE_OVERTONES:
        db = np.interp(seconds(), times, [lugging_db, pulling_db, pulling_db, eased_db])
        boost_db = PIPE_BOOST_DB / (1 + ((multiple * rate_hz - PIPE_HZ) / PIPE_WIDTH_HZ) ** 2)
        level = amp(db + boost_db + away_db + 1.5 * wobble(6.5))
        out += level * engine_tone(firings, multiple, waver)
    return out


# Spectrum of the pipe. Each row: frequency in Hz, relative level in dB.
PIPE_SPECTRUM = [(60, -52), (115, -14), (160, 1), (195, 3), (260, -2), (330, 2.5), (385, 5.5), (450, -5.5),
                 (700, -12.5), (1500, -25), (5000, -120)]


def puffs(firings, away_db):
    """Pulse excitation: one uneven puff per cylinder is coloured by the exhaust pipe."""
    at = np.flatnonzero(np.diff(np.floor(firings)))
    cylinders_db = np.array([8.0, -1.5, -10, -12.0, 5.0, -20.0])  # in firing order
    pulses = np.zeros(N)
    pulses[at] = amp(np.resize(cylinders_db, len(at)) + 3.2 * rng.standard_normal(len(at)))
    return amp(away_db - 40.0) * unit(filtered(pulses, colour(PIPE_SPECTRUM)))


def exhaust(firings, rate_hz):
    """Superposition: the firing tone, the weaker engine tones and the puffs through the pipe."""
    away_db = passing(shade_db=4.5, turn_db=8.0)
    return boom(firings) + overtones(firings, rate_hz, away_db) + puffs(firings, away_db)


# The engine lugs, picks up and holds. Each row: time in seconds, firing rate in Hz.
FIRING_RATE = [(0, 63.23), (.28, 65.03), (1.25, 59.46), (1.6, 59.14), (2.35, 55.79), (2.9, 59.1),
               (3.5, 64.72), (4.25, 70.3), (4.55, 69.8), (4.8, 73.44), (5.3, 71.6), (5.9, 73.94),
               (7.5, 75.17), (8.6, 70.76), (9.82, 70.2)]


def scene(drift_db=1.0):
    """Interaural level difference: the truck drifts left behind the fence, until the microphone turns."""
    rate_hz, = curves(FIRING_RATE)
    firings = np.cumsum(rate_hz) / SR
    roar = patchy(clatter(firings) + trailer() + yard(), depth_db=2.0)
    whine_db = -44.0 + passing(shade_db=15.5, ahead_m=ENGINE_AHEAD_M)
    thin_whine = whine(firings, pitch_hz=1435, level_db=whine_db)
    background = far_whine() + squeaks() + tyres() + load()
    everything = background + roar + thin_whine + exhaust(firings, rate_hz)
    return everything * amp(np.outer([.5, -.5], drift_db * (hidden() - turned())))


# Balance of the ports. Each row: frequency in Hz, left minus right in dB.
PORT_BALANCE = [(60, 2.5), (1290, 3), (2380, -0.5), (4400, -2.2), (8120, -0.9), (15000, 0.5)]
TOP_HZ = 15850


def record(dry):
    """Band limiting: the left port hears more bass, and nothing passes above the limit."""
    return filtered(dry, lambda hz: amp(np.outer([.5, -.5], along(PORT_BALANCE, hz))) * (hz < TOP_HZ))


dry = scene()
out = record(dry)
output_pcm(out)
```